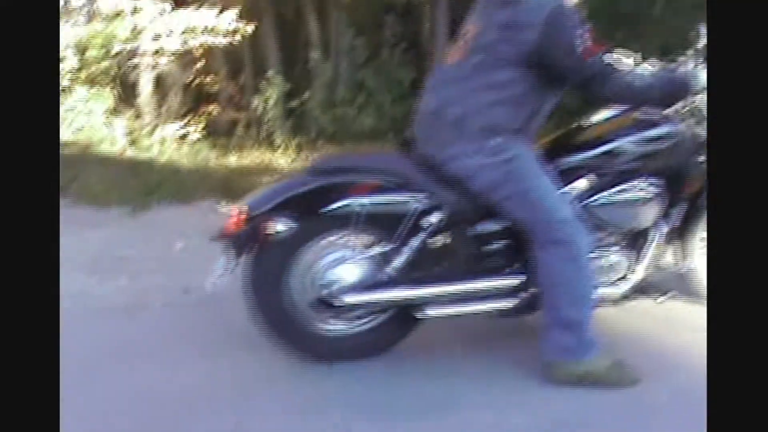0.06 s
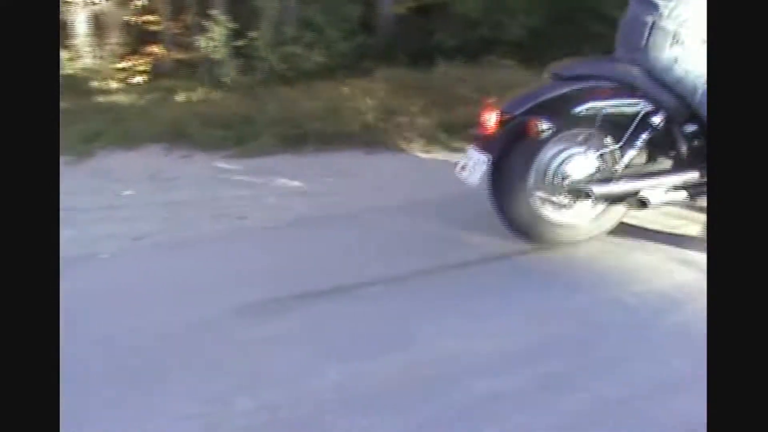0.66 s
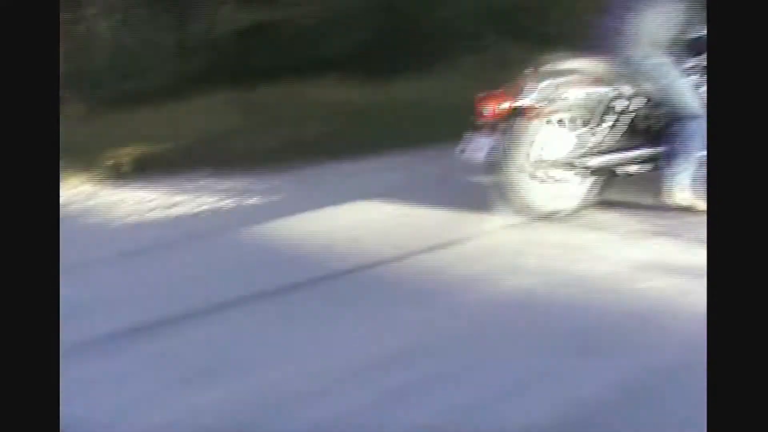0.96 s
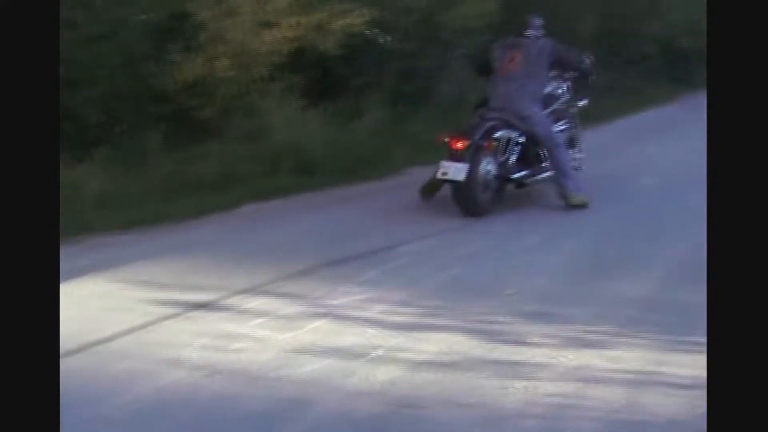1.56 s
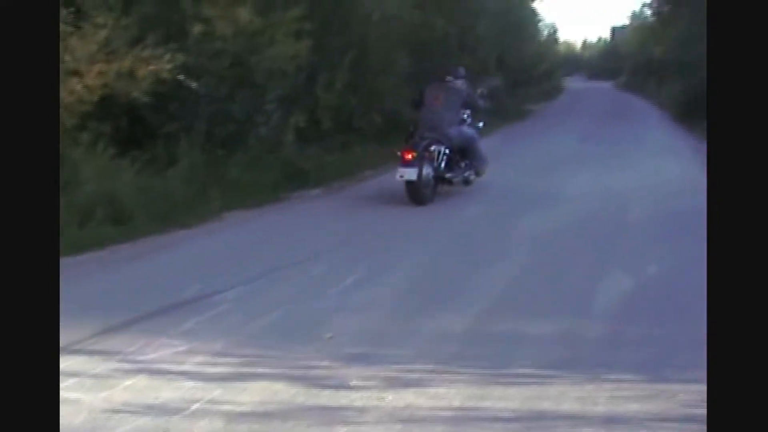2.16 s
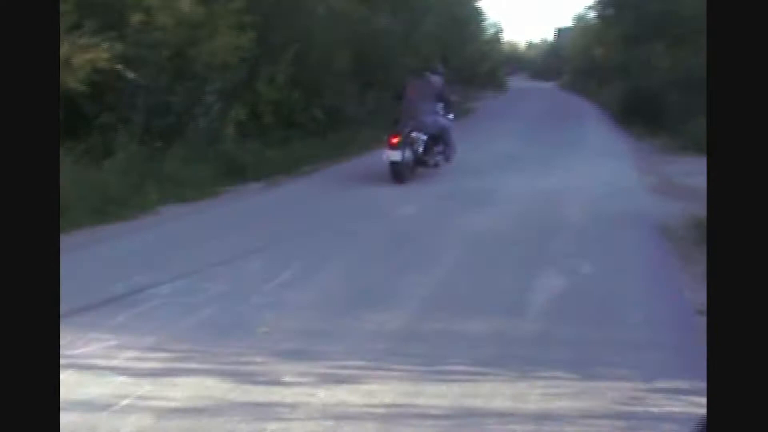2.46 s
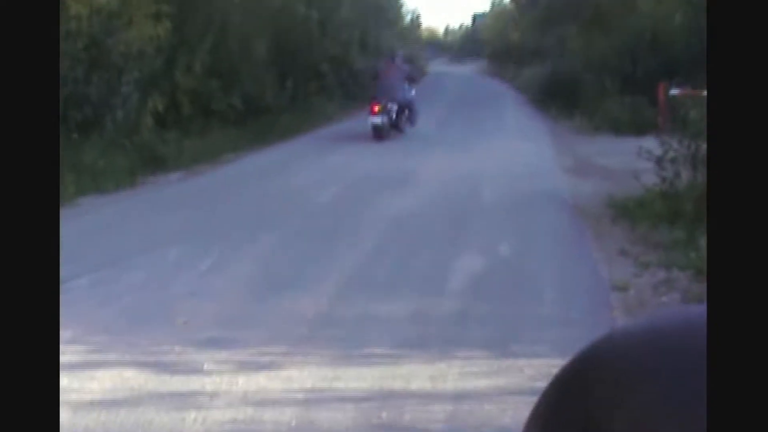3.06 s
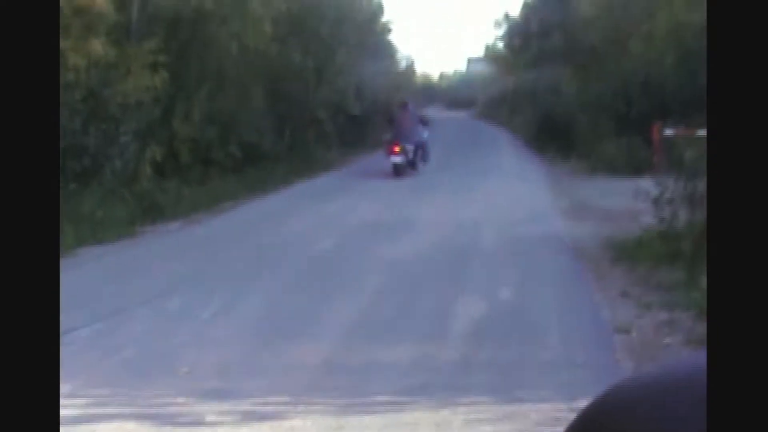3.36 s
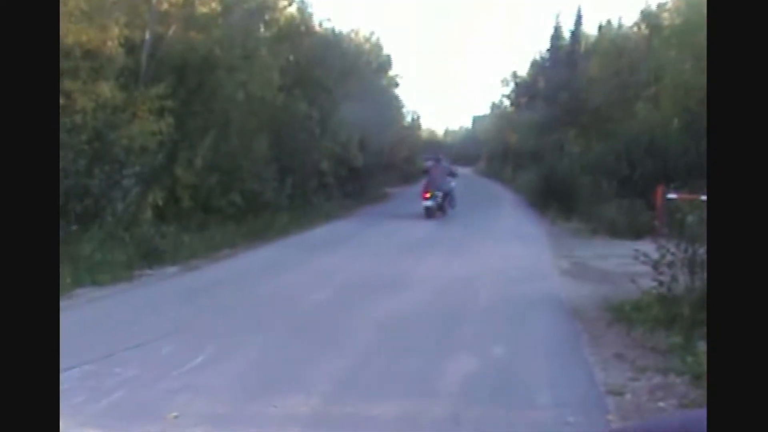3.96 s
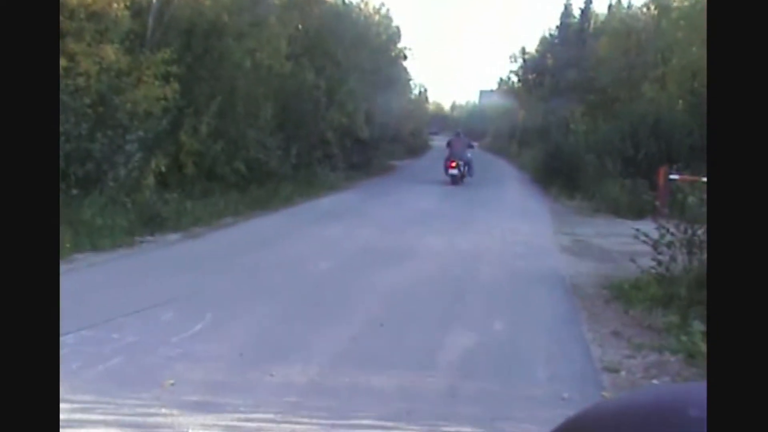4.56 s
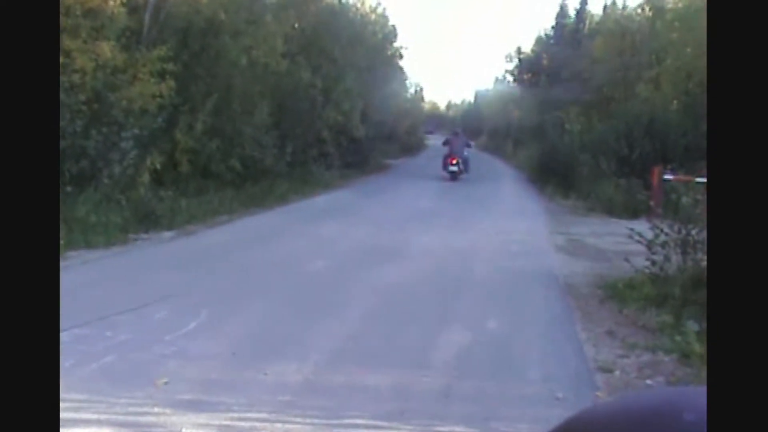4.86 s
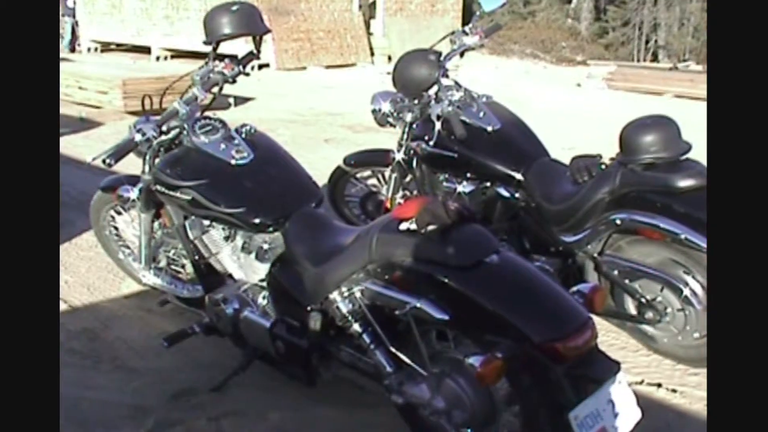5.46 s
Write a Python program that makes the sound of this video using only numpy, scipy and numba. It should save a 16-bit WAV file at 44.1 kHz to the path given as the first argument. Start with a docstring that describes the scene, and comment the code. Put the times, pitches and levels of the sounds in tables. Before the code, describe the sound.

A V-twin motorcycle revs hard right by the microphone, overloading it, while the spinning rear tyre squeals and roars on the road. The squeal stops as the throttle shuts and the revs drop. The bike then pulls away with a raspy bark and eases into a slow, uneven putter, with small blips and exhaust pops. It fades down a forest road, its echo from the trees growing more prominent.

```python
"""A V-twin motorbike does a burnout on a forest road, so close that the microphone overloads.
Its two cylinders fire unevenly; each firing rings the exhaust pipes and lets out a rasp of gas.
The spinning rear tyre squeals and roars until the throttle shuts at about 1.5 s and the revs fall.
At 2 s the rider pulls away, then potters off, with unburnt fuel popping in the pipes from about 3 s.
By the end, the echo from the trees is a large part of what we hear."""
import sys
import numpy as np
from scipy import signal
from scipy.fft import rfft, irfft
from scipy.io import wavfile
from scipy.ndimage import uniform_filter1d
from numba import njit

SR = 44100
rng = np.random.default_rng(int(sys.argv[2]) if len(sys.argv) > 2 else 0)


def to_wav(sig):
    """Store sig (one row per channel, or 1-D mono) as 16-bit WAV at the path in sys.argv[1].

    Samples outside -1..1 are clipped; the rate is SR.
    """
    pcm = np.clip(np.atleast_2d(sig), -1, 1) * 32767
    pcm = np.round(pcm).astype(np.int16)
    wavfile.write(sys.argv[1], SR, pcm.T)  # frames by channels


N = 248281
TIME = np.arange(N) / SR
CRUISE_HZ = 20  # engine cycles per second at an easy pace

# engine speed; each cylinder fires once a cycle: t/s, cycle rate/Hz
ENGINE_SPEED = [(0.0, 44.19), (0.169, 31.14), (0.515, 34.97), (0.689, 35.46), (0.934, 38.13),
                (1.363, 34.79), (1.561, 34.71), (1.895, 24.13), (2.056, 22.62), (2.321, 23.58),
                (2.844, 21.27), (3.06, 17.56), (3.248, 15.97), (3.422, 12.85), (3.63, 12.31),
                (3.768, 15.68), (4.878, 13.27), (5.3, 14.06)]
# the hollow middle notes of the pipes: f/Hz, width/Hz, level/dB
HOLLOW_NOTES = [(464, 28, 11.5), (507, 79, 14.5), (555, 33, 8), (827, 250, -2), (1206, 230, -31.5),
                (1519, 64, -5.5)]
# tone colour of the rushing noise: f/Hz, level/dB
RUSH_COLOUR = [(500, -14), (900, 2.5), (1650, 0.5), (1900, -2.5), (2300, 0), (3200, -2.5), (4500, -13),
               (8000, -28.5)]
# tone colour of the sizzle at the pipe mouths: f/Hz, level/dB
SIZZLE_COLOUR = [(2000, -6.5), (3000, -5.5), (3600, -2), (4100, 2), (4600, 3.5), (5000, 0), (5400, -2),
                 (6200, -5.5), (8500, -11.5), (10200, -10), (12000, -43)]


def firings(throttle, start_cycles=.354, rear_lag_cycles=.395, jitter_s=.00007):
    """Two cylinders fire in uneven pairs. Gives each firing's sample, strength and cylinder (1 = rear)."""
    # the sound skips once, as at a cut: t/s, shift/cycles
    sound_skip = [(2.535, 0), (2.565, .448)]
    speed, = curves(ENGINE_SPEED)
    cycles = start_cycles + np.cumsum(speed) / SR - curves(sound_skip)[0]
    beat = np.arange(1, 2 * int(cycles[-1]))
    rear = beat % 2
    early_late, weak_strong = rng.standard_normal((len(beat), 2)).T
    seconds = np.interp(beat // 2 + rear_lag_cycles * rear, cycles, TIME) + jitter_s * early_late
    at = np.clip((seconds * SR).astype(int), 0, N - 1)
    # fuel burns less evenly at low revs with the throttle shut
    lumpy = (1 - throttle) * np.interp(speed, [22, 26], [1, 0])
    spread_db = 1.17 + 3 * lumpy[at]
    return at, undb(spread_db * weak_strong), rear


def exhaust(throttle):
    """Each firing kicks the pipes and puffs out gas. Gives the sound and a left-right difference."""
    # echo from the trees against direct sound, before each layer adds its offset: t/s, level/dB
    tree_echo = [(0, -23), (1.6, -7.5), (2.0, -1), (2.12, -1.5), (2.85, -3.5), (3.4, 9), (4.6, 12.5),
                 (5.3, 9)]
    echo_db, = curves(tree_echo)
    at, strength, rear = firings(throttle)
    kicks = np.zeros(N)
    kicks[at] = -strength
    puffs = gas_puffs(at, strength, rear, throttle)
    tone = pipe_tone(kicks, puffs, throttle, echo_db)
    noise, side = rasp(puffs, throttle, echo_db - 3)
    return tone + noise, side


def pipe_tone(kicks, puffs, throttle, echo_db, heat_rise=.2, turbulence=.23):
    """Pressure kicks make the pipes boom, bark and ring hollow; the bare kick is heard as a knock."""
    # pipe notes at half throttle: f/Hz, width/Hz, level/dB
    gulp_notes = [(46, 40, -9), (80, 41, 9.5)]
    boom_notes = [(93, 36, -24.5), (110.3, 47.5, 6.5)]
    bark_notes = [(163, 16, -3.5), (225.6, 63.5, 4), (253.8, 24, -4.5)]
    heat = 1 + heat_rise * (throttle - .5)
    # the pipes gulp slowly when little gas flows
    low_flow = (1 - throttle) ** 3 * CRUISE_HZ / curves(ENGINE_SPEED)[0]
    gulp = ring_pipe(kicks * low_flow, gulp_notes, heat) * undb(6)
    boom = band(ring_pipe(kicks, boom_notes, heat), 73, 240, order=1)
    boom = band(boom + gulp, 34, 220, order=2)
    bark = band(ring_pipe(kicks, bark_notes, heat), 46, 274, order=4)
    churn = steady(kicks) + turbulence * steady(puffs * rng.standard_normal(N))
    hollow = band(ring_pipe(churn, HOLLOW_NOTES, np.ones(N)), 300, 1850, order=4)
    knock = band(kicks, 356, 760, order=2)
    return (steady(woods(boom, echo_db - 10)) * loudness("boom", throttle)
            + steady(woods(bark, echo_db - 3)) * loudness("bark", throttle)
            + steady(woods(hollow, echo_db + 4)) * loudness("hollow", throttle)
            + steady(knock) * loudness("knock", throttle))


def ring_pipe(x, notes, pitch_scale):
    """A pipe rings at its own notes; a pitch scale above 1 raises them, as hot gas does."""
    return sum(undb(db) * resonate(x, hz * pitch_scale, float(width)) for hz, width, db in notes)


def gas_puffs(at, strength, rear, throttle, lag_s=.0018, rise_ms=.15, leak=.01):
    """The flow of gas jumps just after each kick, then dies away until the next one."""
    # gas leaving the pipes: t/s, fade time/ms, rear cylinder against front/dB
    puff_shape = [(0, 5.3, 4.5), (1.44, 5.7, 2), (2.0, 5.6, -13), (2.12, 1.8, -10), (2.88, 4.8, -1.5),
                  (2.96, 5.9, 3), (3.4, 3.3, -8.5), (5.3, 3.4, 6.5)]
    fade_ms, rear_db = curves(puff_shape)
    latest = np.maximum(np.searchsorted(at / SR + lag_s, TIME) - 1, 0)
    age_ms = 1000 * np.abs(TIME - at[latest] / SR - lag_s)
    jet = np.exp(-age_ms / fade_ms) * (1 - np.exp(-age_ms / rise_ms))
    return strength[latest] * undb(rear_db * rear[latest]) * jet + leak * (1.05 - throttle)


def rasp(puffs, throttle, echo_db, ping_spread=.088):
    """Each puff sizzles and pings the pipe mouths over a rushing noise; a second sizzle gives width."""
    # notes of the metal pipe mouths: f/Hz, width/Hz, level/dB
    ping_notes = [(4130, 960, -1.5), (4940, 350, 6), (6300, 500, -7), (8300, 500, -6.5), (10070, 500, -7.5)]
    # the rush is exhaust gas, swelling in the burnout into a roar of tyre scrub and overload
    rush, sizzle, side = (steady(woods(puffs * hiss(colour), echo_db))
                          for colour in (RUSH_COLOUR, SIZZLE_COLOUR, SIZZLE_COLOUR))
    bursts = puffs ** 2 * rng.standard_normal(N)
    ping = steady(ring_pipe(bursts, ping_notes, 1 + ping_spread * waver(25)))
    sizzle_gain = loudness("sizzle", throttle)
    noise = rush * loudness("rush", throttle) + sizzle * sizzle_gain + ping * loudness("ping", throttle)
    return noise, side * sizzle_gain


def loudness(layer, throttle):
    """How strong one layer of the bike's sound is, given throttle, wheelspin, revs and distance."""
    # each layer: level/dB, then what is added by full throttle/dB, full wheelspin/dB,
    # revs/(dB per doubling), distance/(dB per m)
    layer_levels = {"boom": (-8, 0.5, -1.5, -3, -.34), "bark": (-19.5, 11, 3.5, 0, -0.0156),
                    "hollow": (-26.5, 4, -16, -4, -0.1232), "knock": (-25.5, -3.5, 1.5, 1.5, -1),
                    "rush": (-27.5, -7, 20.5, 1, -.5), "sizzle": (-28, 4, 8.5, -1, -.62),
                    "ping": (-44.5, 27, -5, 8.5, -0.2326)}
    # the rear wheel spins until it grips: t/s, spin/(0 to 1)
    wheelspin = [(1.41, 1), (1.48, 0.02)]
    # the bike rides off: t/s, distance/m
    bike_distance = [(0, 0.67), (1.4, 5.7), (2.9, 18.6), (4.1, 26.3), (4.7, 34.2), (5.3, 31)]
    db, throttle_db, spin_db, doubling_db, db_per_m = layer_levels[layer]
    spin, = curves(wheelspin)
    metres, = curves(bike_distance)
    doublings = np.log2(curves(ENGINE_SPEED)[0] / CRUISE_HZ)
    return undb(db + throttle_db * throttle + spin_db * spin + doubling_db * doublings + db_per_m * metres)


def tyre_squeal(start_s=.125, end_s=1.462, rise_s=.03, fall_s=.065, level_db=-8.5, flutter_db=2.5):
    """The tread sticks and slips near one pitch, never evenly, over a scrubbing noise."""
    # pitch of the squeal: t/s, f/Hz
    squeal_pitch = [(0.15, 1119), (0.156, 1062), (0.192, 1055), (0.24, 1254), (0.264, 1048), (0.302, 1117),
                    (0.602, 1087), (0.736, 1153), (0.978, 1083), (1.41, 1097), (1.42, 1175), (1.45, 1176)]
    hz, = curves(squeal_pitch)
    sliding = np.clip(np.minimum((TIME - start_s) / rise_s, (end_s - TIME) / fall_s), 0, 1)
    wobble = 1 + .023 * waver(90) + .015 * waver(500)
    phase = 2 * np.pi * np.cumsum(hz * wobble) / SR
    slip = phase + .25 * waver(400)  # slips come early or late, which roughens the overtones
    overtones = np.sin(2 * slip) + undb(-9.5) * np.sin(3 * slip) + undb(-11.5) * np.sin(4 * slip)
    overtone_db = -26 + 11.5 * np.minimum(TIME, end_s)  # they grow as the rubber heats
    tone = undb(level_db) * np.sin(phase) + undb(overtone_db) * sliding ** 2 * overtones
    scrub = steady(resonate(rng.standard_normal(N), hz, width_hz=220.)) * undb(level_db - 14)
    off_pitch_db = .0135 * np.abs(hz - np.median(hz))  # a little louder away from its usual pitch
    return sliding * (tone * undb(flutter_db * waver(110) + off_pitch_db) + scrub)


def fuel_pops():
    """Unburnt fuel goes off in the pipes: a crack of gas and a hollow thud."""
    # the pops: t/s, crack level/dB, thud level/dB, crack fade time/ms
    pops = [(2.953, -18, -36.5, 5.2), (3.003, -19, -20, 8.1), (3.085, -19.5, -26, 4.9),
            (3.181, -19, -27, 5.7), (3.239, -21.5, -15.5, 8.6), (3.364, -11.5, -10, 1.7),
            (3.952, -28.5, -20, 10), (3.981, -30, -9.5, 14), (4.222, -27.5, -30, 6.2),
            (4.247, -31, -29, 12), (4.786, -36, -7, 6.8), (5.154, -32, -36, 4.8), (5.228, -29.5, -20, 2.3)]
    cracks, kicks = np.zeros(N), np.zeros(N)
    for s, crack_db, thud_db, fade_ms in pops:
        age_ms = 1000 * (TIME - s)
        cracks += undb(crack_db) * np.exp(-np.abs(age_ms) / fade_ms) * (age_ms >= 0)
        kicks[int(s * SR)] -= undb(thud_db)
    thuds = band(ring_pipe(kicks, HOLLOW_NOTES, np.ones(N)), 150, 900, order=1)
    thuds *= np.abs(kicks).max() / np.abs(thuds).max()
    gas = hiss(SIZZLE_COLOUR) + undb(-18) * hiss(RUSH_COLOUR)
    return woods(cracks * gas + thuds, echo_db=-12)


def woods(x, echo_db, fade_s=.55, delay_s=.008):
    """Trunks and bushes scatter the sound back as a short, dense echo."""
    t = TIME[:SR // 2]
    echo = rng.standard_normal(len(t)) * undb(-60 * t / fade_s) * (t > delay_s)
    return x + undb(echo_db) * signal.fftconvolve(x, echo / np.linalg.norm(echo))[:N]


def undb(db):
    """Turn decibels into a number to multiply by."""
    return 10 ** (np.asarray(db) / 20)


def curves(table):
    """Join a table's points with straight lines: one curve over time for each column after the first."""
    s, *columns = np.transpose(table)
    return [np.interp(TIME, s, column) for column in columns]


def steady(x):
    """Hold the average level at 1 while single firings still stand out."""
    size = SR // 7
    power = uniform_filter1d(uniform_filter1d(x * x, size), size)
    return x / np.sqrt(power + 1e-12)


def waver(hz):
    """A smooth random wiggle, about 1 in size, with hz new values a second."""
    size = int(SR / hz)
    steps = rng.standard_normal(4096)[np.arange(N) // size % 4096]
    return 1.192 * uniform_filter1d(steps, size)


def hiss(colour):
    """Noise of level 1 with the given tone colour."""
    hz, db = np.transpose(colour)
    gain = undb(np.interp(np.log(np.fft.rfftfreq(N, 1 / SR) + 1), np.log(hz), db))
    noise = irfft(rfft(rng.standard_normal(N)) * gain, N)
    return noise / noise.std()


@njit
def resonate(x, hz, width_hz):
    """A filter that rings at a moving pitch; the narrower it is, the longer it rings."""
    y, mid, low = np.empty(len(x)), 0., 0.
    for i in range(len(x)):
        tuning, damping = np.tan(np.pi * hz[i] / SR), width_hz / hz[i]
        swing = (mid + tuning * (x[i] + 1e-18 - low)) / (1 + tuning * (tuning + damping))
        mid, low = 2 * swing - mid, low + 2 * tuning * swing
        y[i] = damping * swing
    return y


def band(x, lo_hz, hi_hz, order):
    """Keep one range of frequencies; a higher order gives sharper edges."""
    return signal.sosfilt(signal.butter(order, [lo_hz, hi_hz], "band", fs=SR, output="sos"), x)


def cut_bass(x, hz):
    """Each side of the microphone loses the deepest bass."""
    return signal.sosfilt(signal.butter(1, hz, "high", fs=SR, output="sos"), x)


def scene(width=.4):
    """Bike and tyre are straight ahead; only the sizzle spreads left and right."""
    # the rider's hand (burnout, coast, pull away, small blips): t/s, throttle/(0 to 1)
    throttle_moves = [(0, 0.74), (.2, 0.74), (.9, 0.83), (1.46, 0.81), (1.485, 0.08), (2.02, 0.27),
                      (2.12, 0.88), (2.3, 0.5), (2.86, 0.76), (2.95, 0.17), (3.72, 0.16), (3.8, 0.53),
                      (3.92, 0.19), (4.04, 0.43), (4.15, 0.29), (5.0, 0), (5.28, 0.54)]
    throttle, = curves(throttle_moves)
    bike, side = exhaust(throttle)
    return bike + tyre_squeal() + fuel_pops() + width * side * np.array([[1], [-1]])


def record(dry, ceiling=.74, hardness=7, top_hz=10700, end_s=5.298):
    """The microphone flattens loud peaks; the camera cuts deep bass and high treble, then stops."""
    left, right = dry / (1 + np.abs(dry / ceiling) ** hardness) ** (1 / hardness)
    heard = np.array([cut_bass(left, hz=25) * undb(-.3), cut_bass(right, hz=3.5)])
    running = np.clip((end_s - TIME) / .002, 0, 1)
    treble_cut = signal.ellip(8, .3, 70, top_hz, fs=SR, output="sos")
    return signal.sosfilt(treble_cut, heard * running)


dry = scene()
out = record(dry)
to_wav(out)
```